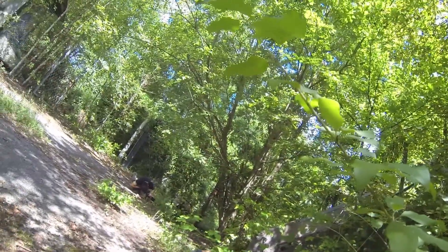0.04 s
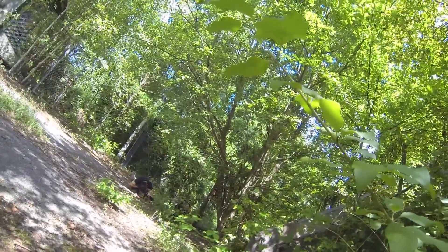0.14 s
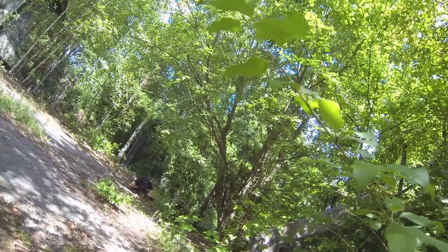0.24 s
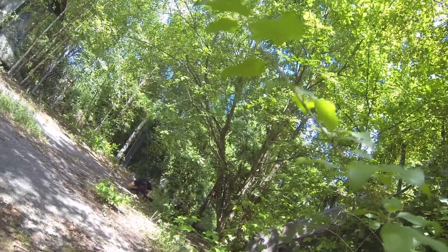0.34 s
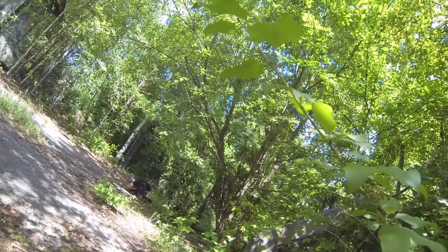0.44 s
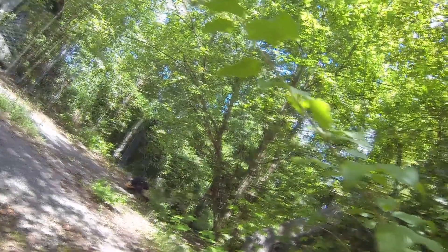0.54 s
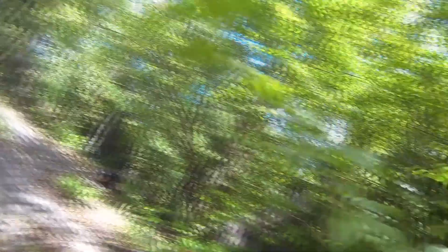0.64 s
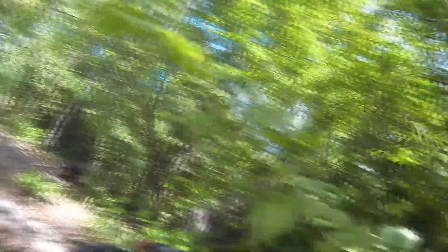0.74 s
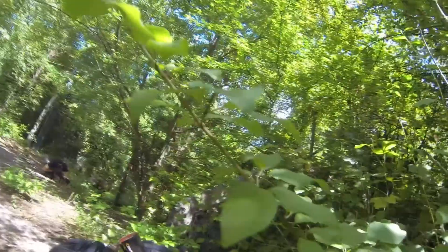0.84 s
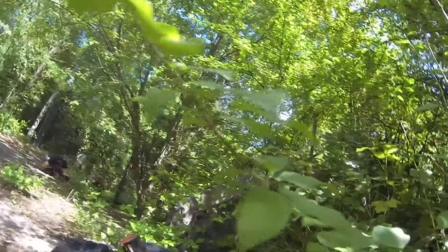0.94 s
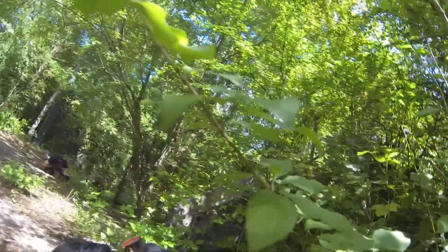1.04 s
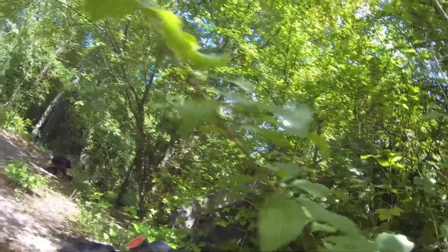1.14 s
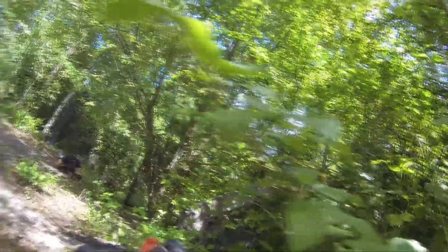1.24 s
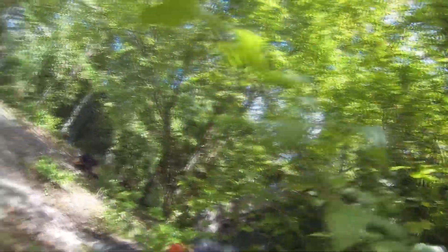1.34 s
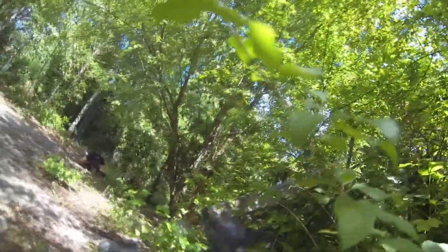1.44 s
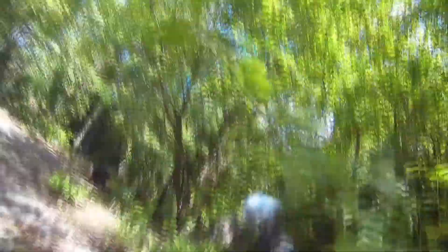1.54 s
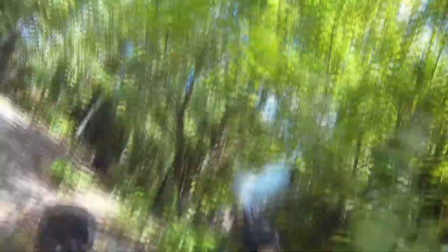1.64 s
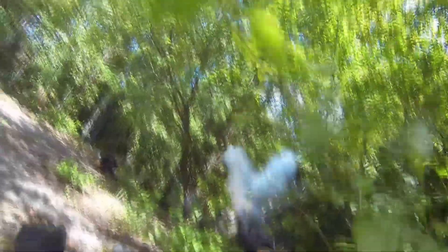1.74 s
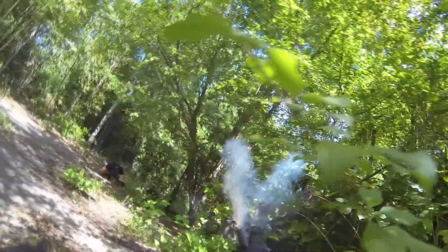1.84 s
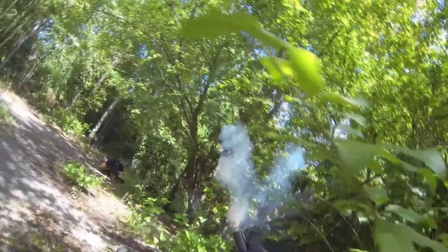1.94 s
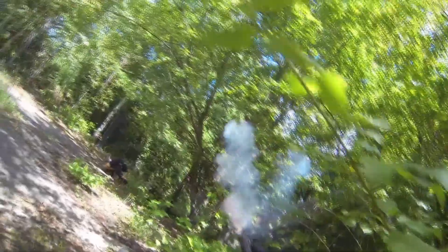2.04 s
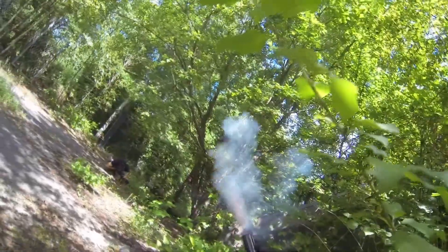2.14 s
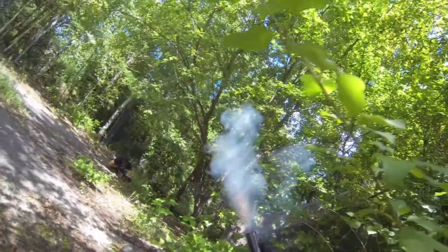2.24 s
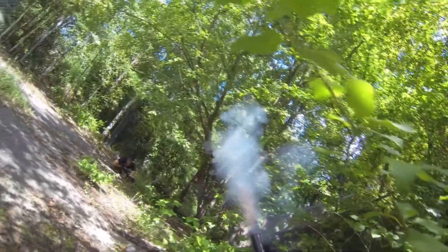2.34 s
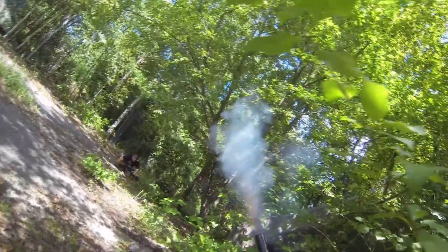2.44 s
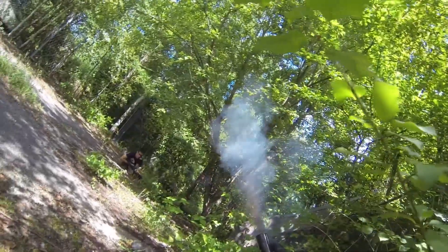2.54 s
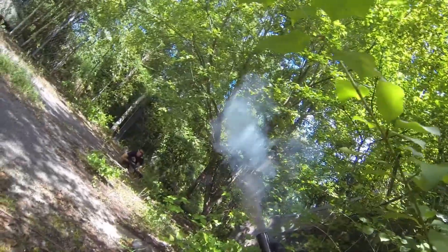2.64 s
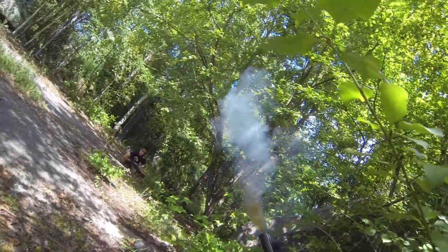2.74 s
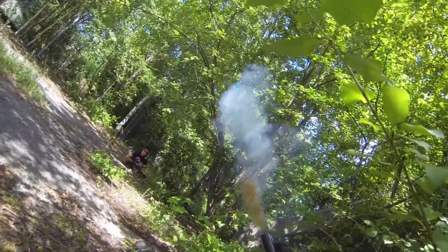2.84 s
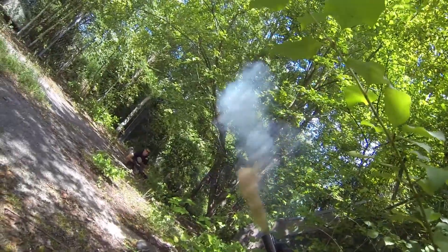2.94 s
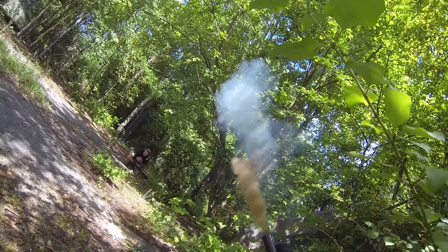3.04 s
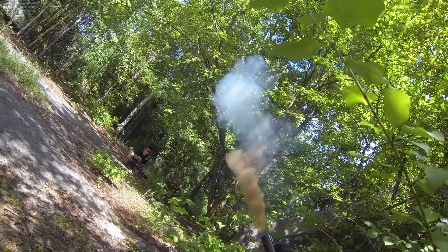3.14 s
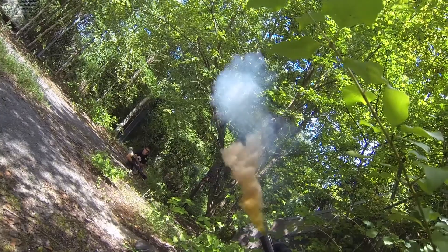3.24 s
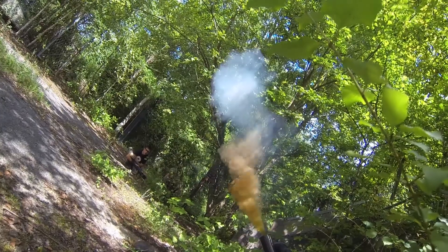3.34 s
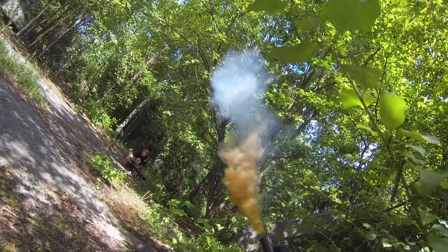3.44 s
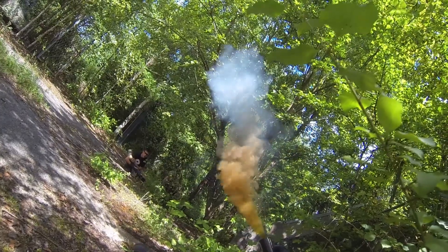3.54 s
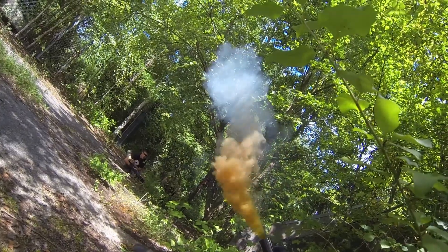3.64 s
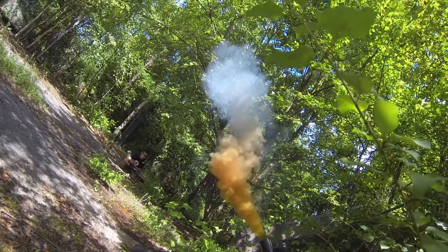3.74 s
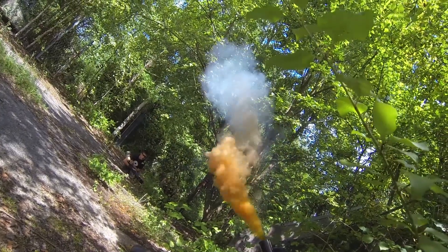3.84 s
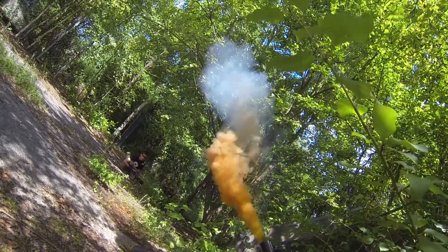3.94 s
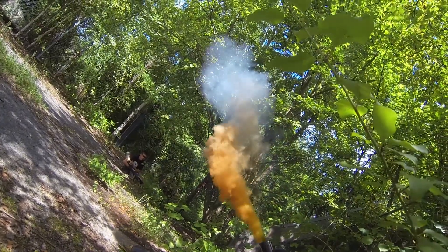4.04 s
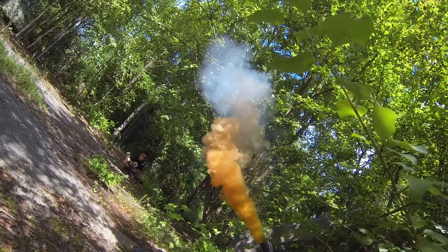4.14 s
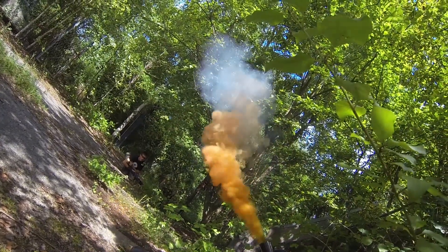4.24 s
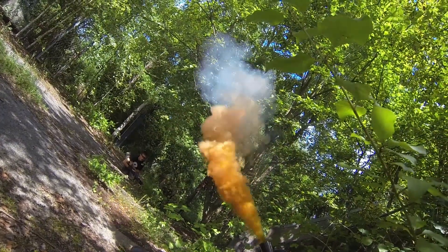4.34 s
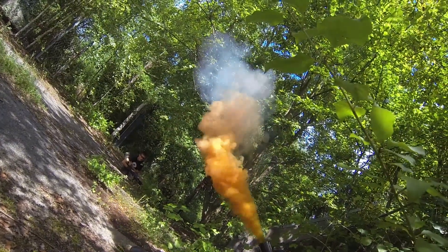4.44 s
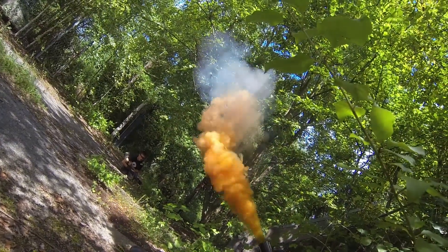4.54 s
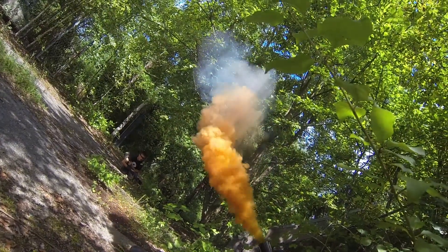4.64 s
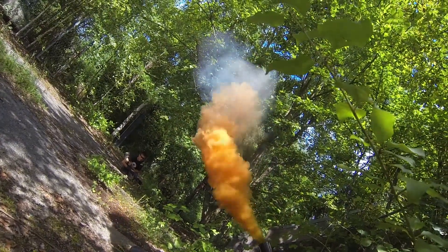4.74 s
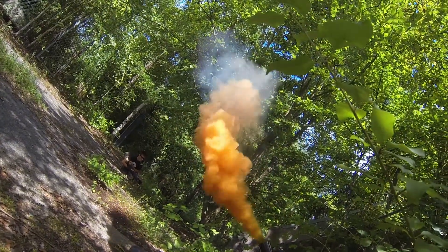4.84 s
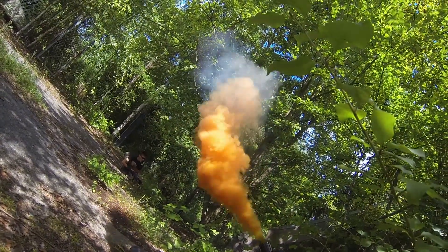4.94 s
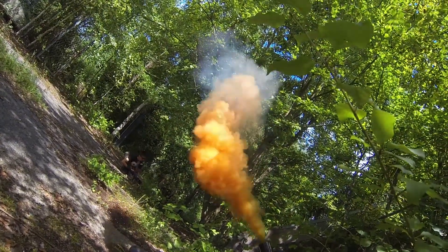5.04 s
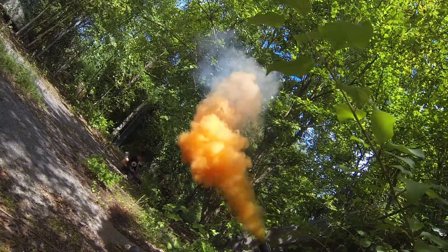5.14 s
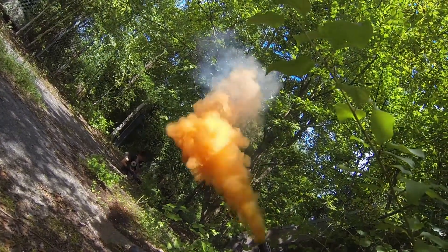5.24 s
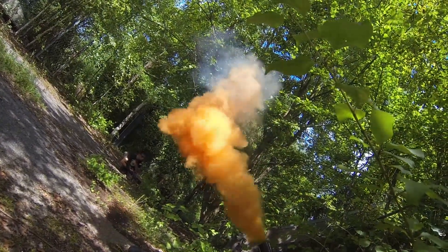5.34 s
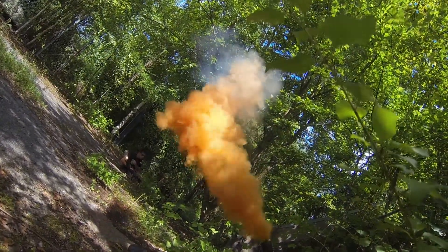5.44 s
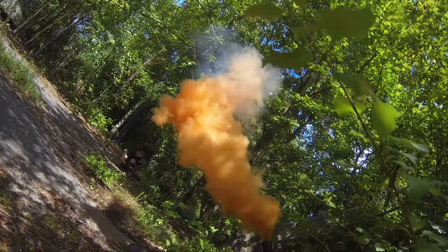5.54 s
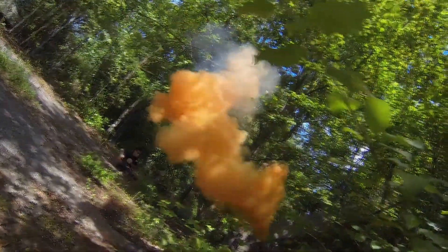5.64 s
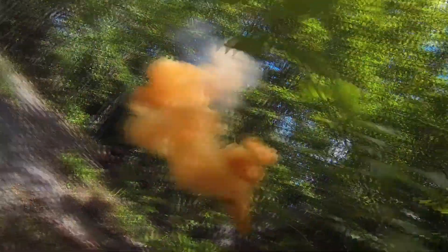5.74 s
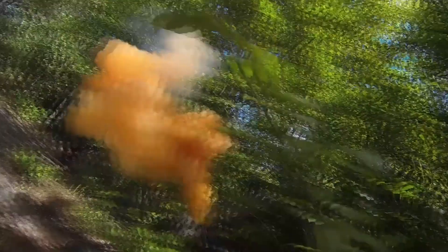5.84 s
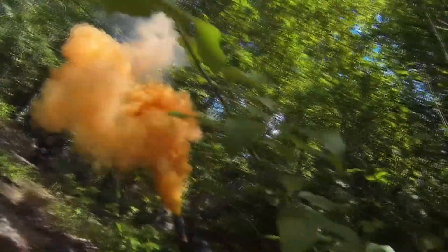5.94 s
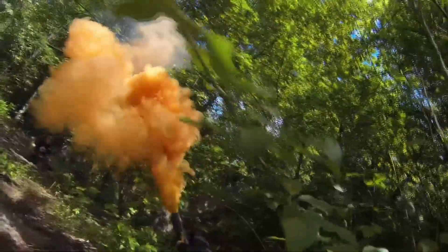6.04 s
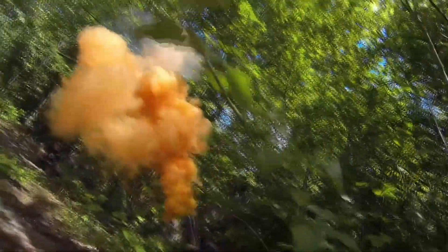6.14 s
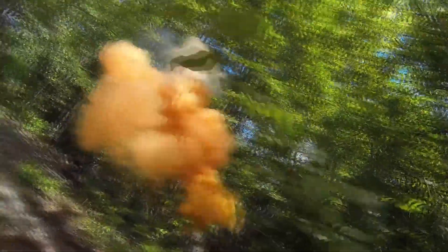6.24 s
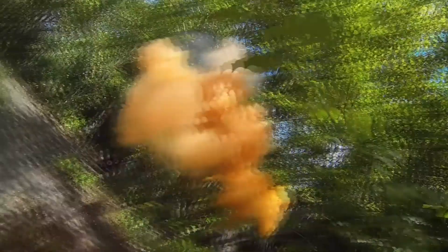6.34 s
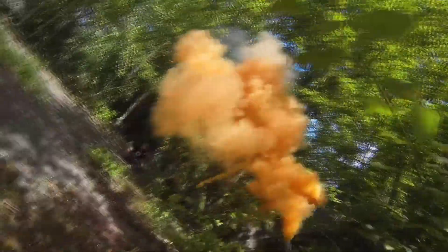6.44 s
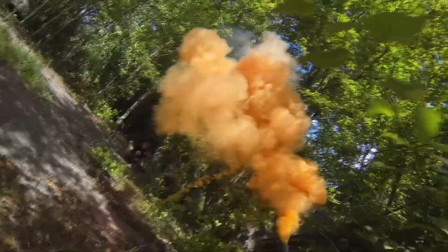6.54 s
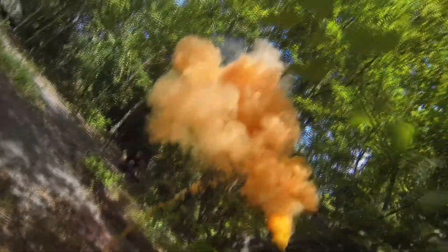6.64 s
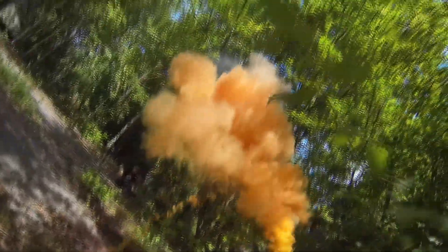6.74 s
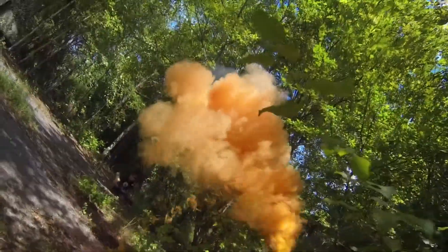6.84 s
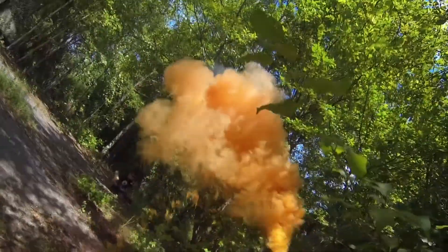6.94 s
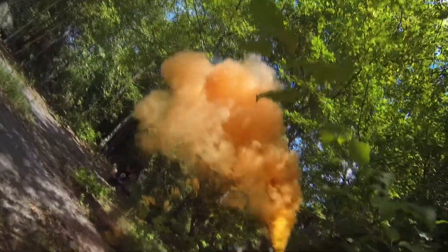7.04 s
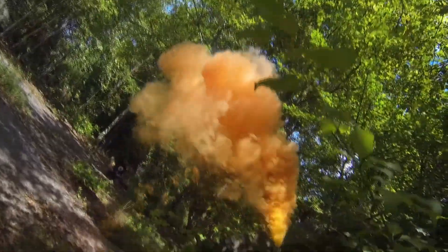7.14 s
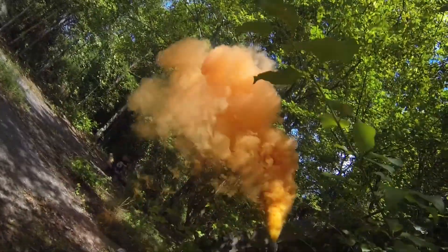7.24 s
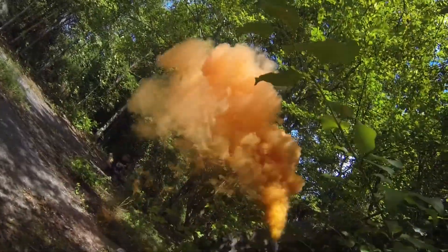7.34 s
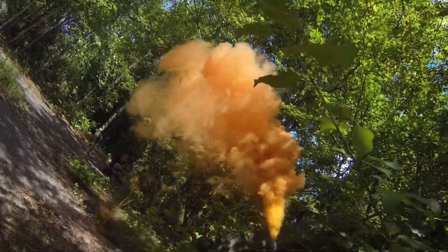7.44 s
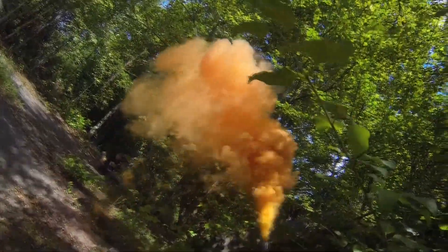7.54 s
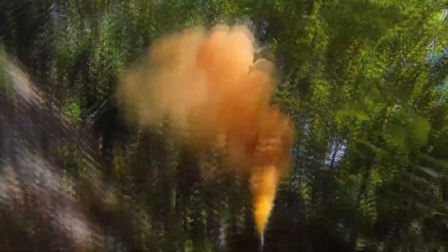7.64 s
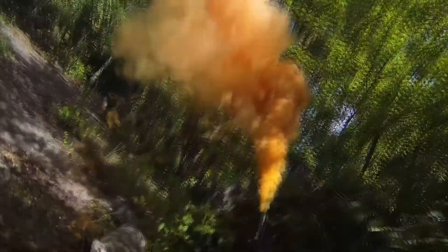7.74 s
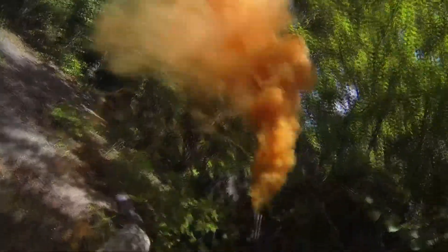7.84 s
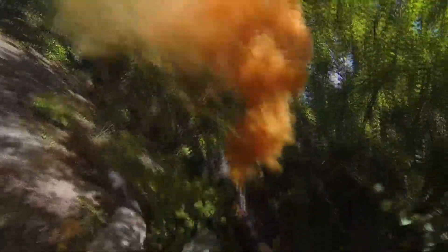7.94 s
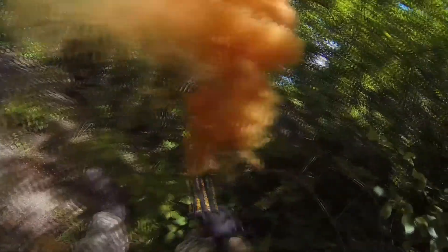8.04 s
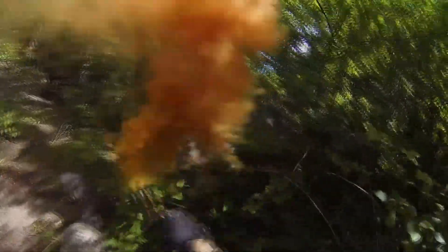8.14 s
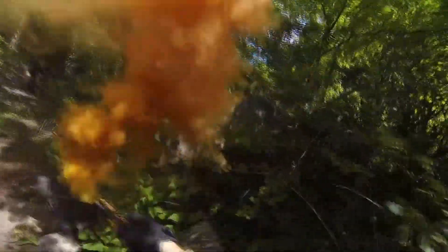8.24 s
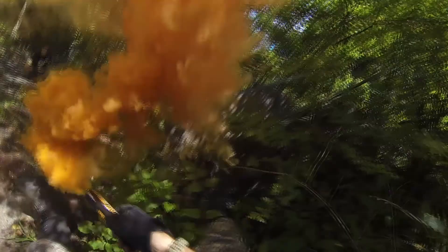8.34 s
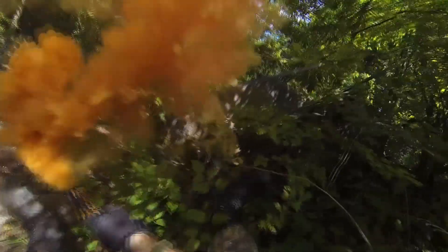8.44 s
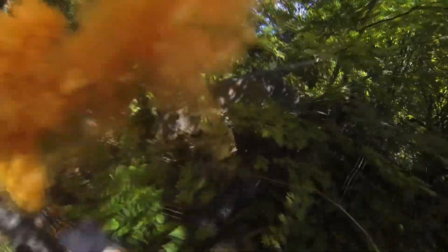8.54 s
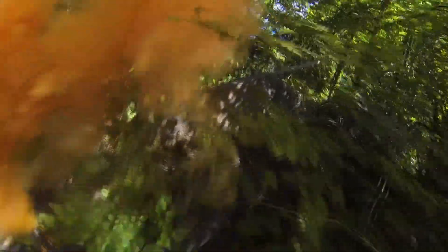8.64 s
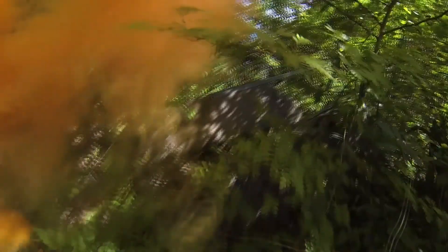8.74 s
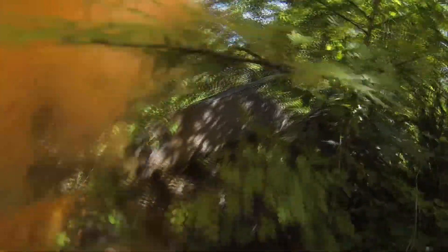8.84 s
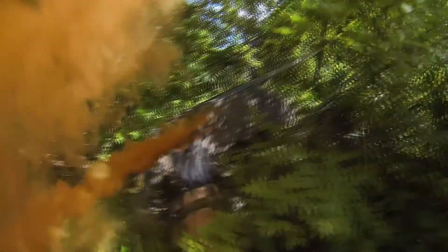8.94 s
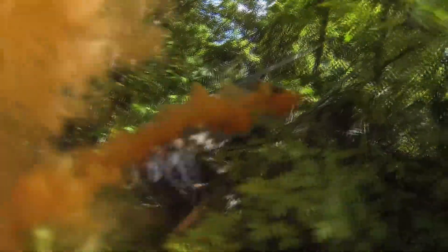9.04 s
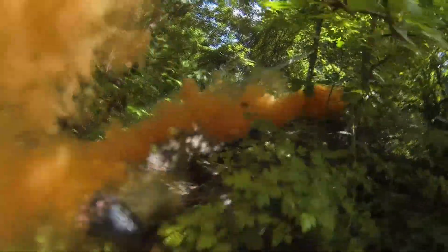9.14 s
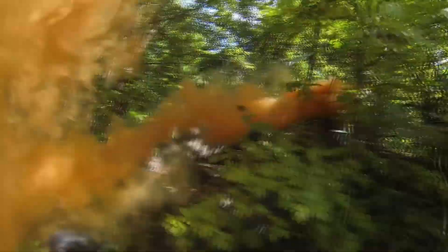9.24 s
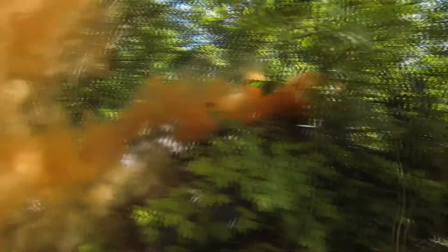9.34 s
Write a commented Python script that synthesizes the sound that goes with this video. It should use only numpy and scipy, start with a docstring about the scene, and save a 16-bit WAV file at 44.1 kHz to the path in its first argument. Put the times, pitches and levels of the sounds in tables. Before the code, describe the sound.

Outdoors among trees, heard close through a camera worn on the body: a hushed start with faint electronic whine and mount creaks, then a hard burst as a smoke canister lights. Gas hisses unevenly with burning crackle, spits, drops back and puffs in small surges. Thuds hit the casing midway; the rush then grows strong and near, mixed with brushing leaves, strap groans and snapping twigs.

```python
"""Still woodland air, a low rumble and a thin whine come first, with faint ticks from a body-worn camera.
A smoke grenade is lit: a ragged burst rings the can, then gas noise rushes, spits once, sinks and swells.
Shaped noise makes the air and the jet; a sliding notch follows the can as it is swung about.
Struck resonances make sparks, twigs, bumps and ticks; dense slips make leaves, gliding tones make groans."""
import sys
import numpy as np
from scipy import signal
from scipy.fft import rfft, irfft, next_fast_len
from scipy.io import wavfile
from scipy.ndimage import uniform_filter1d, map_coordinates

SR = 44100
rng = np.random.default_rng(int(sys.argv[2]) if len(sys.argv) > 2 else 0)


def unload_wav(signal):
    """Save mono or channel-first audio to the path in sys.argv[1] as 16-bit WAV at rate SR, clipped to [-1, 1]."""
    wavfile.write(
        sys.argv[1],
        SR,
        np.round(np.clip(np.atleast_2d(signal).T, -1, 1) * 32767).astype(np.int16),
    )


N = 414099
TIME = np.arange(N) / SR
SPIT_S = 1.91   # peak of the jet's one spit

# rush, billow, hiss and sizzle of the jet, and how each follows the gas: (low edge [Hz], high edge [Hz],
# level [dB], share of flow [ratio], share of surge [ratio], share of spit [ratio], flutter spread [dB])
JET_PARTS = [(654, 1943, 0, 0.99, 0.72, .25, 1.0), (169, 660, -4.5, 0.86, 0.43, 0.12, 1.14),
             (2050, 5160, -0.5, 1.0, 0.81, 0.73, 1.0), (5330, 20500, 0.5, 0.89, 0.84, 1.36, 0.6)]
# flow of gas: high at first, sinking, then swelling as the smoke takes hold: (time [s], level [dB])
FLOW = [(1.43, -45), (1.52, -36.5), (1.74, -39.5), (1.84, -47), (2.1, -43), (2.38, -40.5), (2.6, -50.5),
        (3.7, -49.5), (3.98, -55), (4.5, -48.5), (4.92, -43.5), (5.42, -43.5), (5.62, -39.5), (6.15, -39.5),
        (6.36, -43), (7.3, -43), (7.6, -37), (8.24, -33), (8.38, -35.5), (8.88, -35), (9.03, -38.5),
        (9.29, -42), (9.39, -36.5)]
# how unevenly the charge burns; sets both crackle and waver: (time [s], level against the rush [dB])
UNEVEN_BURN = [(1.43, -10), (1.95, -9), (2.2, -10.5), (7.6, -15), (8.3, -13.5), (9.0, -6.5), (9.39, -15)]
# what sparks and twigs ring with: (centre [Hz], width [Hz], level [dB])
CRACK_MODES = [(394, 260, -7.5), (820, 210, -2), (1190, 310, 0), (2140, 510, 1.5), (2980, 190, 4),
               (3990, 230, -6.5), (5150, 570, -12.5), (5940, 400, -13.5), (6960, 900, -19.5),
               (9960, 850, -20.5), (12000, 840, -23.5)]


def from_db(db):
    """Decibels to gain."""
    return 10 ** (np.asarray(db) / 20)


def rms_one(x):
    """Scale to unit rms."""
    return x / np.sqrt(np.mean(x ** 2) + 1e-20)


def in_time(rows):
    """Each column of a curve, joined by straight lines."""
    s, *columns = np.transpose(rows)
    return [np.interp(TIME, s, column) for column in columns]


def add(out, s, sound):
    """Mix a short sound in at a given time."""
    start = max(round(s * SR), 0)
    out[start:start + len(sound)] += sound[:max(N - start, 0)]


def drift(rate, size=N):
    """Random curve of rms 1, with `rate` random points a second joined by straight lines."""
    knots = np.arange(size) * rate / SR
    return rms_one(map_coordinates(rng.standard_normal(4000), [knots], order=1, mode="wrap"))


def swell(length_s):
    """A smooth rise and fall."""
    return np.sin(np.linspace(0, np.pi, int(length_s * SR)))


def filtered(x, order, edge_hz, kind):
    """Butterworth filter, run forward."""
    return signal.sosfilt(signal.butter(order, edge_hz, kind, fs=SR, output="sos"), x)


def coloured_noise(colour, peaks=()):
    """Steady noise with a broad colour and resonant lifts; rms 1."""
    size = next_fast_len(N, True)
    hz = np.arange(1, size // 2 + 2) * SR / size
    points = np.array(colour)
    db = np.interp(np.log(hz), np.log(points[:, 0]), points[:, 1])
    for centre, width, lift_db in peaks:
        db = db + lift_db / (1 + (2 * (hz - centre) / width) ** 2)
    spectrum = rfft(rng.standard_normal(size)) * from_db(db)
    return rms_one(irfft(spectrum, size)[:N])


def resonator(hz, width_hz):
    """Gain, zeros and poles of one resonance; a wider one dies sooner."""
    r = np.exp(-np.pi * width_hz / SR)
    poles = [1, -2 * r * np.cos(2 * np.pi * hz / SR), r * r]
    return (1 - r * r) / 2, [1, 0, -1], poles


def resonate(x, modes):
    """Parallel resonances with alternating signs."""
    out = 0
    for k, (hz, width_hz, db) in enumerate(modes):
        gain, zeros, poles = resonator(hz, width_hz)
        out = out + (-1) ** k * from_db(db) * gain * signal.lfilter(zeros, poles, x)
    return out


def notched(x, hz, depth, width_hz, size=512):
    """Take a share of a sliding resonance away, block by block."""
    out, state = x.copy(), np.zeros(2)
    for i in range(0, N, size):
        gain, zeros, poles = resonator(hz[i], width_hz)
        band, state = signal.lfilter(zeros, poles, x[i:i + size], zi=state)
        out[i:i + size] -= depth[i] * gain * band
    return out


def blow(modes, length_s, soft_hz=15000, size=4096):
    """A jolt and a dying spray of smaller ones ring the modes; soft contacts are duller; peak 1."""
    dying = np.exp(-np.arange(size) / (length_s * SR))
    force = rng.standard_normal(size) * dying
    force[0] += 3   # the first jolt
    # a flat spectrum favours no mode by chance; the second decay shortens the blow again
    force = irfft(np.exp(1j * np.angle(rfft(force)))) * np.sqrt(dying)
    sound = resonate(filtered(force, 2, min(soft_hz, .45 * SR), "low"), modes)
    return sound / np.abs(sound).max()


def grains(per_s, spread_db, size=N):
    """Random clicks of uneven size and either sign; rms 1."""
    born = rng.random(size) < per_s / SR
    sizes = from_db(spread_db * np.minimum(rng.exponential(1, size), 4))
    return rms_one(born * sizes * rng.choice([-1, 1], size))


def woodland_air(level_db=-49):
    """Still woodland: steady noise of fixed colour."""
    # spectrum of the quiet wood: (frequency [Hz], relative density [dB per Hz])
    air_colour = [(20, -3), (60, -2), (95, -4.5), (150, -15), (260, -18), (600, -22), (1300, -27.5),
                  (2200, -31.5), (3000, -28), (3800, -35), (5200, -37), (6200, -44.5), (7900, -37),
                  (9200, -40.5), (9800, -49), (10900, -51.5), (12800, -45.5), (15500, -51)]
    return from_db(level_db) * coloured_noise(air_colour)


def gusting():
    """Decibels by which bell-shaped gusts and lulls lift or lower the stirring air."""
    # gusts and lulls: (middle [s], half length [s], lift [dB])
    gust_rows = [(.47, .05, 3), (1.63, 0.17, 9.5), (4.65, .45, -4), (5.21, 0.022, 8), (5.6, 0.076, 9),
                 (5.86, 0.034, 11), (6.68, 0.044, 5), (7.284, 0.038, 10), (7.63, 0.064, 8), (8.02, 0.17, 5),
                 (8.37, 0.039, 6), (8.8, 0.17, 10), (9.0, 0.067, 8.5), (9.31, .04, 3)]
    return sum(lift_db * np.exp(-((TIME - s) / half_s) ** 2) for s, half_s, lift_db in gust_rows)


def rumble(start_db=-52, moving_from_s=5.2, growth_db_per_s=2):
    """Air stirs on the camera as low noise, more as the wearer moves, with gusts and lulls."""
    # spectrum of the rumble: (frequency [Hz], relative density [dB per Hz])
    rumble_colour = [(15, -4), (45, -4), (70, -8.5), (110, -9), (170, -13), (260, -24), (600, -62)]
    moving_db = growth_db_per_s * np.maximum(TIME - moving_from_s, 0)
    return from_db(start_db + moving_db + gusting()) * coloured_noise(rumble_colour)


def whine(ripple_hz=75, waver_hz=40, pulses_per_s=36.8):
    """A high tone ripples in upward slides and flicks up; a lower one pulses at the ripple's pace."""
    beat = np.pi * pulses_per_s * TIME
    first_lift_s, lift_period_s, lift_s, lift_hz = 0.137, 0.2505, .011, 281
    since_lift = (TIME - first_lift_s + lift_period_s / 2) % lift_period_s - lift_period_s / 2
    hz = 5050 + ripple_hz * signal.sawtooth(2 * beat) + waver_hz * drift(250)
    hz = hz + lift_hz * np.exp(-(since_lift / lift_s) ** 2)
    tone = np.sqrt(2) * from_db(-70.5) * np.sin(2 * np.pi * np.cumsum(hz) / SR)

    # the pulsing tone swells slowly and breaks off
    peak_s, rise_db_per_s, fall_db_per_s = 1.22, 16, 120
    away_db = np.maximum(rise_db_per_s * (peak_s - TIME), fall_db_per_s * (TIME - peak_s))
    gate = np.sin(beat) ** 16
    pulse_hz = 4330 + waver_hz * drift(200)
    pulses = 2 * from_db(-64 - away_db) * gate * np.sin(2 * np.pi * np.cumsum(pulse_hz) / SR)
    return tone + pulses


def foliage(slips_per_s=1800, spread_db=2.0, groan_wobble=0.046):
    """Leaves scrape in dense little slips; the strap and stems drag with wobbling, gliding groans."""
    # leaves sweep over the camera: (middle [s], length [s], level [dB])
    brush_rows = [(7.882, 0.036, -37), (8.439, 0.066, -39), (8.62, 0.052, -36), (8.778, 0.052, -29.5),
                  (8.969, .08, -31.5), (9.124, 0.06, -36), (9.177, 0.043, -26.5), (9.209, 0.025, -32)]
    # resonances of the leaves: (centre [Hz], width [Hz], level [dB])
    leaf_modes = [(520, 390, -3.5), (2300, 440, 1), (2700, 300, 6), (3500, 940, -3), (4700, 420, -3),
                  (5360, 450, -6.5), (10500, 550, -20)]
    # strap and stems drag along the case: (middle [s], length [s], level [dB], start [Hz], end [Hz])
    groan_rows = [(1.579, .036, -28.5, 380, 290), (1.737, 0.039, -36, 380, 310),
                  (1.617, 0.32, -36.5, 45.5, 42), (7.90, .16, -36, 146, 146),
                  (8.714, 0.11, -35.5, 237, 252), (9.018, .036, -24, 240, 126)]
    out = np.zeros(N)
    for s, length_s, db in brush_rows:
        contact = swell(length_s)
        scrape = rms_one(resonate(grains(slips_per_s, spread_db, size=8192), leaf_modes))
        add(out, s - length_s / 2, from_db(db) * contact * np.resize(scrape, len(contact)))
    for s, length_s, db, start_hz, end_hz in groan_rows:
        contact = swell(length_s) ** 2
        wobble = 1 + groan_wobble * drift(130, size=len(contact))
        hz = np.linspace(start_hz, end_hz, len(contact)) * wobble
        groan = np.sqrt(2) * np.sin(2 * np.pi * np.cumsum(hz) / SR)
        add(out, s - length_s / 2, from_db(db) * contact * groan)
    return out


def settling(from_s=.15, until_s=.82, middle_db=-48, spread_db=4, count=7):
    """The camera mount settles with faint ticks at random: (time [s], peak [dB])."""
    return [(from_s + when * (until_s - from_s), middle_db + spread_db * (2 * force - 1))
            for when, force in rng.random((count, 2))]


def creak(start_s=.8523, gap_s=.014, first_db=-42, growth_db=1.5, count=4):
    """The mount creaks in an even run of ticks, each louder than the last: (time [s], peak [dB])."""
    return [(start_s + k * gap_s, first_db + k * growth_db) for k in range(count)]


def spit_sparks(count=5, reach_s=0.1, spark_db=-36):
    """A few sparks tick around the spit: (time [s], peak [dB])."""
    return [(SPIT_S + reach_s * when, spark_db) for when in rng.uniform(-.5, 1, count)]


def camera_case(bump_s=.00002, tick_s=0.0013, soft_hz=1400):
    """Soft bumps and tiny hard ticks reach the microphone through its case and ring it."""
    # bumps on the camera: (time [s], peak [dB])
    bump_rows = [(0.2914, -26), (1.572, -22), (1.713, -22.5), (5.1995, -25.5), (5.857, -22.5),
                 (6.0464, -13), (6.1038, -15.5), (7.290, -29), (7.868, -15.5), (8.771, -16.5)]
    # resonances of a bump: (centre [Hz], width [Hz], level [dB])
    bump_modes = [(335, 144, 4), (556, 560, -0.5), (874, 270, 0)]
    # the mount ticks under strain: (time [s], peak [dB])
    tick_rows = [(.129, -41), (0.2924, -40), (.376, -42), (0.454, -41), (.594, -44), (.712, -42),
                 (.7533, -43), (1.519, -33), (1.625, -26), (2.434, -44), (3.542, -39), (3.965, -44),
                 (8.9931, -17), (9.183, -31)]
    # resonances of a tick: (centre [Hz], width [Hz], level [dB])
    tick_modes = [(1850, 500, 2.5), (5200, 3100, -11), (10250, 850, -2), (11050, 170, -8),
                  (11600, 900, -20)]
    out = np.zeros(N)
    for s, db in bump_rows:
        add(out, s, from_db(db) * blow(bump_modes, bump_s, soft_hz))
    for s, db in tick_rows + creak() + settling() + spit_sparks():
        add(out, s, from_db(db) * blow(tick_modes, tick_s))
    return out


def cracks():
    """Sparks and snapping twigs: short blows on shared resonances."""
    # sparks and twigs: (time [s], peak before echoes [dB], length [s], brightness [Hz])
    snap_rows = [(0.248, -40, .002, 3000), (.686, -42, .008, 1990), (.753, -32, 0.0006, 12000),
                 (1.314, -40, .008, 3000), (1.352, -38.5, 0.022, 3000), (1.5184, -25, 0.0021, 12000),
                 (1.6245, -14, .002, 13000), (1.714, -23, 0.0037, 2500), (2.3756, -10, 0.0028, 11000),
                 (5.952, -22, 0.0018, 2000), (6.25, -24.5, 0.0007, 1190), (7.847, -17.5, 0.0004, 3000),
                 (7.881, -15.5, 0.0055, 9000), (8.3914, -16, .002, 6000), (8.7714, -17, 0.0018, 4000),
                 (8.883, -15, 0.0032, 4000), (8.9386, -16.5, .003, 12000), (8.951, -17.5, 0.0018, 9000),
                 (8.973, -19, .001, 14000), (9.097, -18, 0.0061, 6000)]
    out = np.zeros(N)
    for s, db, length_s, bright_hz in snap_rows:
        add(out, s, from_db(db) * blow(CRACK_MODES, length_s, bright_hz))
    return out


def igniter(start_s=1.400, hold_s=0.014, pop_gap_s=.006, pop_offset_s=0.0017, count=4):
    """A ragged burst of gas sets the can ringing; sharp cracks mark its pops."""
    # resonances of the can: (centre [Hz], width [Hz], level [dB])
    can_modes = [(372, 170, -0.5), (990, 150, 4), (1980, 320, 6), (2560, 216, 7), (2990, 180, 3.5),
                 (3720, 560, -7), (5330, 580, -16), (6720, 620, -17), (9700, 2200, -26.5),
                 (12250, 450, -27)]
    age = TIME - start_s
    rise_db_per_s, fall_db_per_s = 2300, 7000
    fade_db = rise_db_per_s * np.maximum(-age, 0) + fall_db_per_s * np.maximum(age - hold_s, 0)
    pops_db = 3 * np.cos(2 * np.pi * (age - pop_offset_s) / pop_gap_s)
    ring = resonate(rng.standard_normal(N), can_modes)
    ring = ring / np.sqrt(uniform_filter1d(ring ** 2, size=SR // 100))   # even over 10 ms
    out = from_db(-13.5 + pops_db - np.minimum(fade_db, 200)) * ring
    for k in range(count):   # the first crack falls in the build-up
        crack_s = start_s + pop_offset_s + (k - 1) * pop_gap_s
        add(out, crack_s, from_db(-9) * blow(can_modes, length_s=.0004))
    return out


def woodland_echo(x, scatter_db=-21, t60=0.22, dull_hz=5000):
    """Close echoes from trunks and ground, then a thin tail scattered by the trees."""
    # trunks and ground: (delay [s], level [dB])
    echo_rows = [(.008, -17), (0.017, -44)]
    age = TIME[:SR // 2]
    tail = filtered(rng.standard_normal(len(age)), 1, dull_hz, "low")
    tail = tail * from_db(-60 * age / t60)
    response = from_db(scatter_db) * tail / np.linalg.norm(tail)
    for s, db in echo_rows:
        response[round(s * SR)] += from_db(db)
    return x + signal.fftconvolve(x, response)[:N]


def sputter(rush_db, per_s=220, spread_db=-1.5):
    """Burning specks fly out with the gas and crackle in step with its rush."""
    level_db = rush_db + in_time(UNEVEN_BURN)[0]
    crackle = rms_one(resonate(grains(per_s, spread_db), CRACK_MODES))
    return (TIME > FLOW[0][0]) * from_db(level_db) * crackle


def surging(choke_db=1.5, choke_s=0.026, clear_s=0.0065, release_s=0.032):
    """Decibels lost while slag narrows the vent and gained when it blows clear."""
    # the vent clears and the jet surges: (clearing [s], length [s], lift [dB])
    surge_rows = [(2.703, 0.075, 6), (2.917, 0.053, 3.5), (3.144, 0.067, 5.5), (3.315, 0.11, 1),
                  (3.61, 0.075, 4), (3.801, .08, 6), (4.88, 0.14, 2.5), (5.743, 0.071, 3),
                  (6.118, 0.089, 1.5), (6.668, 0.063, 4), (6.864, 0.11, 4), (7.04, .22, 3.5),
                  (7.345, 0.13, 1), (8.392, 0.072, 5), (8.512, 0.054, 3), (8.592, 0.094, 3.5),
                  (8.737, 0.11, 5.5), (9.098, .07, 7)]
    out = np.zeros(N)
    for s, length_s, lift_db in surge_rows:
        age = TIME - s
        out -= np.interp(age, [-2 * choke_s, -choke_s / 2, 0, clear_s], [0, choke_db, choke_db, 0])
        attack = np.clip(age / clear_s, 0, 1)
        release = np.clip(.5 + (s + length_s - TIME) / release_s, 0, 1)
        out += lift_db * attack * release
    return out


def jet_levels(reference_db=-45, billow_share_of_gusts=0.4, billow_loss_per_sizzle_db=0.17):
    """Decibels of rush, billow, hiss and sizzle: each takes its share of flow, surges and spit."""
    # treble against the middle of the jet: (time [s], hiss level [dB], sizzle level [dB])
    treble_rows = [(1.47, 0.5, -18), (1.66, -4.5, -21), (1.81, 1.5, -16), (2.0, -4, -16.5),
                   (2.35, -7, -26.5), (2.65, -4.5, -29), (3.7, -3.5, -21), (4.2, -8, -29), (4.75, -6, -19),
                   (5.25, -2, -3.5), (5.55, -4.5, -13), (6.0, -4, -20), (6.7, -7, -17.5),
                   (7.5, -6.5, -17.5), (7.88, -7.5, -9.5), (8.15, -1.5, -21), (8.7, -1, -17),
                   (9.39, -4, -17)]
    flow_db, surge_db = in_time(FLOW)[0] - reference_db, surging()
    build_s, release_s = .08, 0.04
    spit_db = np.interp(TIME - SPIT_S, [-build_s, 0, release_s], [0, 17.5, 0])
    hiss_db, sizzle_db = in_time(treble_rows)
    # the billow swells with the gusts, and thins as the sizzle stands out above its mean
    billow_db = billow_share_of_gusts * gusting()
    billow_db = billow_db - billow_loss_per_sizzle_db * (sizzle_db - sizzle_db.mean())
    levels = []
    for part, own_db in zip(JET_PARTS, [0, billow_db, hiss_db, sizzle_db]):
        _, _, db, of_flow, of_surge, of_spit, _ = part
        gas_db = of_flow * flow_db + of_surge * surge_db + of_spit * spit_db
        levels.append(reference_db + db + own_db + gas_db)
    return levels


def jet(levels, waver_db=5.5, waver_rate=55, flutter_rate=90, notch_width_hz=650,
        upper_notch_ratio=1.96, spray_db=-9, spray_hz=11500):
    """Turbulent gas: the burn wavers as a whole while eddies of each size flutter on their own."""
    # broad colour of the jet: (frequency [Hz], relative density [dB per Hz])
    jet_colour = [(150, -13.5), (240, -2), (330, 3.5), (620, 0), (1020, 0.5), (1220, -4.5), (1550, 1),
                  (2600, 2), (3050, -2), (3700, -5.5), (4600, -13.5), (5500, -18), (6500, -24.5),
                  (9000, -33), (12000, -37), (15000, -49)]
    # resonances of vent and camera case: (centre [Hz], width [Hz], lift [dB])
    jet_peaks = [(437, 220, 2.5), (837, 380, 4.5), (1850, 320, 4), (4150, 380, 5), (5260, 340, 6.5),
                 (7500, 830, 1), (9100, 480, 6.5), (10250, 400, 3.5), (12400, 400, 2)]
    # a notch slides as the can is swung about the camera: (time [s], notch [Hz], depth [0-1])
    aim_rows = [(1.8, 3870, 0.3), (1.92, 3350, 0), (2.2, 3500, 0.84), (5.7, 3260, .66), (5.95, 4500, .5),
                (6.2, 4400, .5), (6.38, 3000, 0.44), (7.4, 3170, 0.6), (7.65, 2820, 0.2),
                (7.95, 2180, 0.36), (8.65, 2320, 0.7), (9.15, 1850, 0.85)]
    lit = np.clip((TIME - 1.405) / .012, 0, 1)
    # waver_db is scaled by the unevenness of the burn
    waver = waver_db * from_db(in_time(UNEVEN_BURN)[0]) * drift(waver_rate)
    notch_hz, depth = in_time(aim_rows)
    depth = np.clip(depth, 0, 1)
    # sound that bends round the case cancels at two pitches set by the direction of the can
    gas = notched(coloured_noise(jet_colour, jet_peaks), notch_hz, depth, notch_width_hz)
    gas = notched(gas, upper_notch_ratio * notch_hz, depth, notch_width_hz)
    out = 0
    for level_db, (low, high, *_, flutter_db) in zip(levels, JET_PARTS):
        band = signal.butter(4, [low, high], "band", fs=SR, output="sos")
        part = signal.sosfiltfilt(band, gas)
        steady = part / np.sqrt(uniform_filter1d(part ** 2, size=SR // 8))   # even over 1/8 s
        out = out + steady * from_db(level_db + flutter_db * drift(flutter_rate))
    # the more the sizzle stands out over the hiss, the louder the finest spray at the top
    hiss_db, sizzle_db = levels[2:]
    spray = rms_one(filtered(coloured_noise(jet_colour, jet_peaks), 4, spray_hz, "high"))
    out = out + spray * from_db(2 * sizzle_db - hiss_db + spray_db)
    return lit * from_db(waver) * out


def scene():
    """Grenade, foliage and camera over the quiet of the wood."""
    levels = jet_levels()
    background = woodland_air() + rumble() + whine()
    nearby = foliage() + camera_case()
    sharp = woodland_echo(igniter() + cracks())
    smoke = sputter(levels[0]) + jet(levels)
    return (background + nearby + sharp + smoke)[None]


def record(dry, low_cut_hz=18, top_cut_hz=15300):
    """The microphone drops the deepest bass; the top is cut steeply."""
    thinned = filtered(dry, 2, low_cut_hz, "high")
    return signal.sosfilt(signal.ellip(12, .1, 80, top_cut_hz, fs=SR, output="sos"), thinned)


dry = scene()
out = record(dry)
unload_wav(out)
```